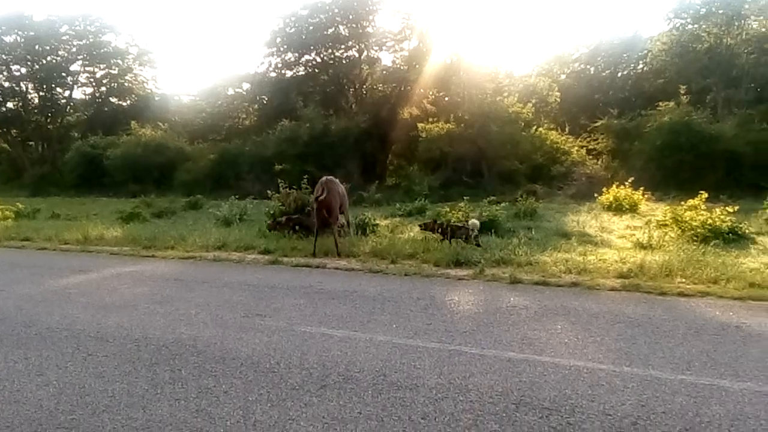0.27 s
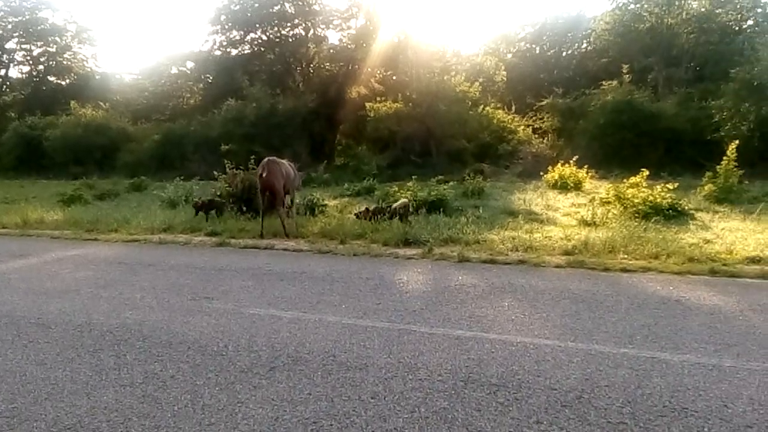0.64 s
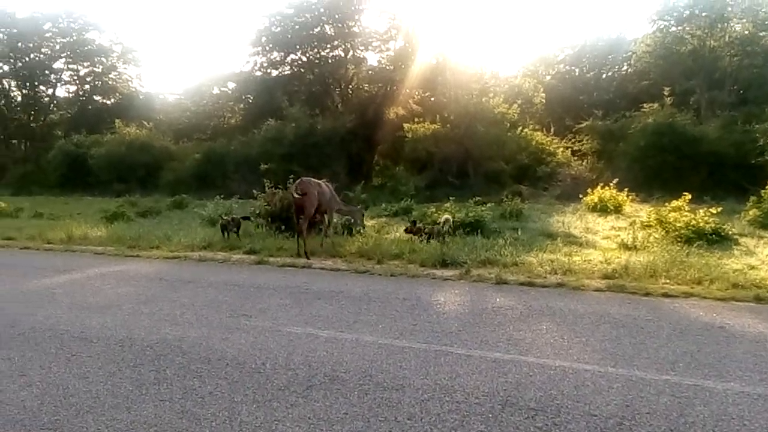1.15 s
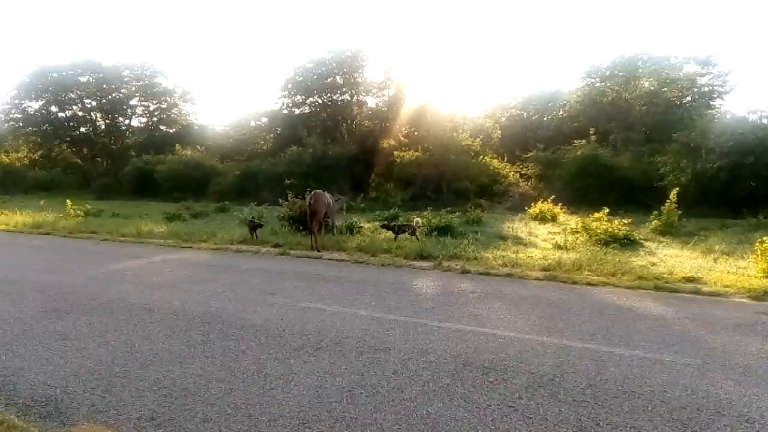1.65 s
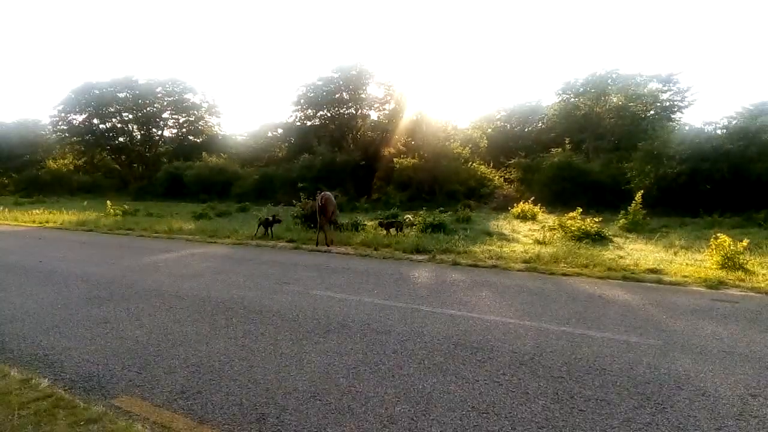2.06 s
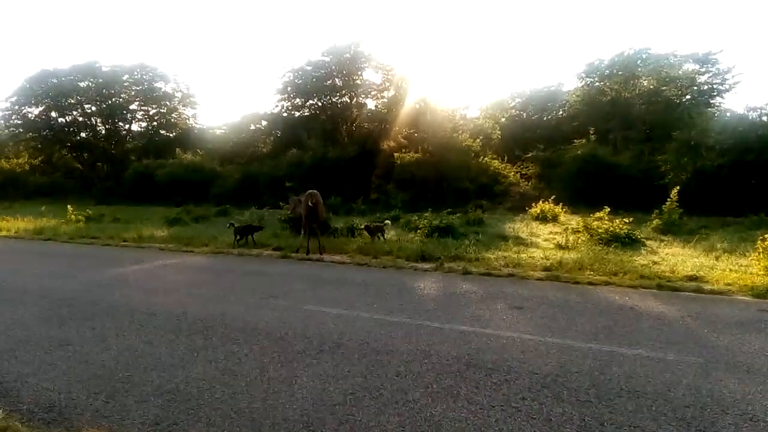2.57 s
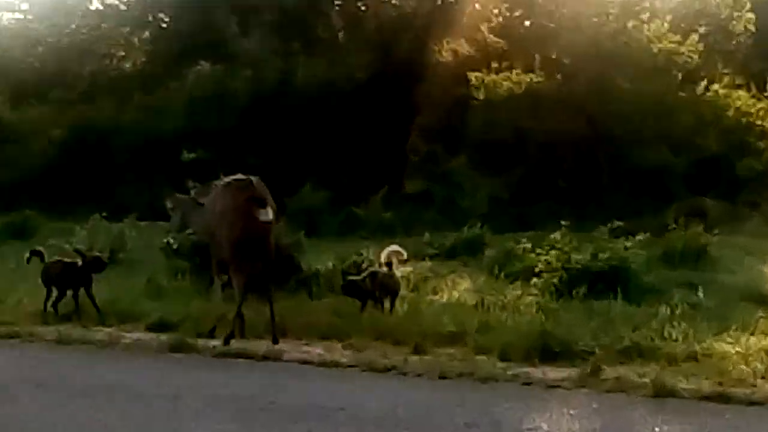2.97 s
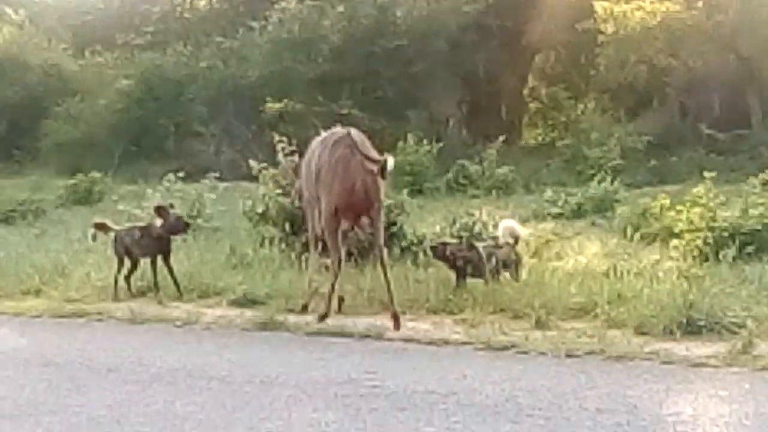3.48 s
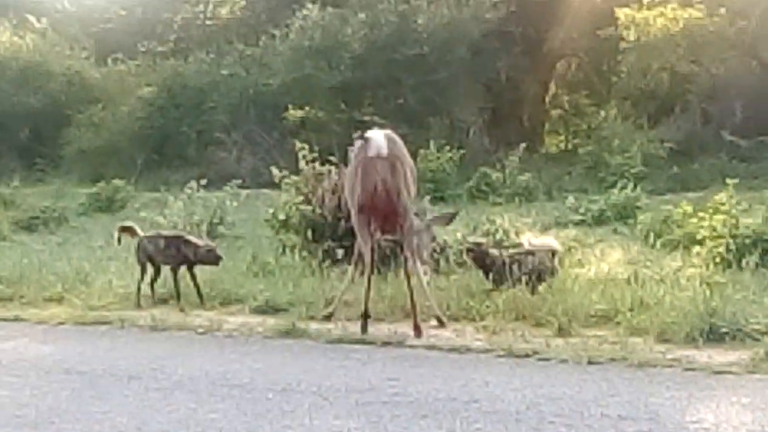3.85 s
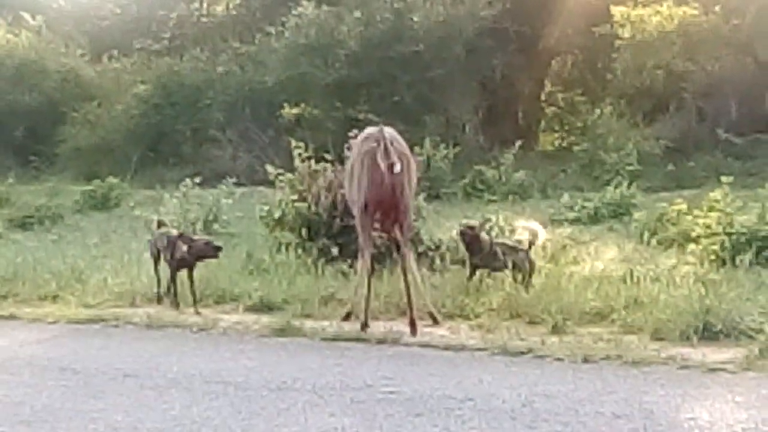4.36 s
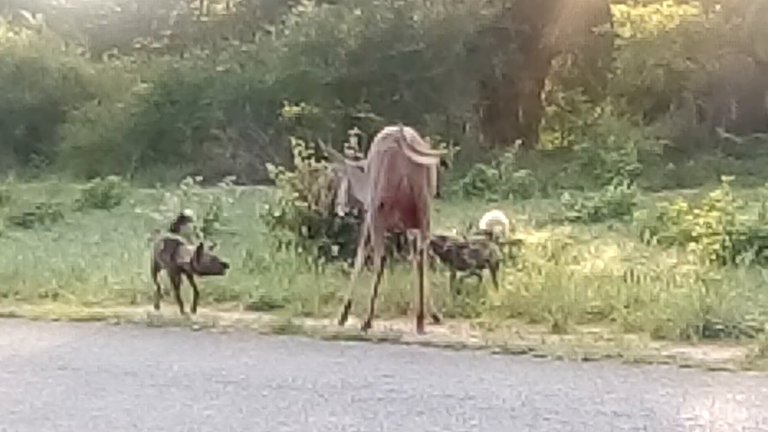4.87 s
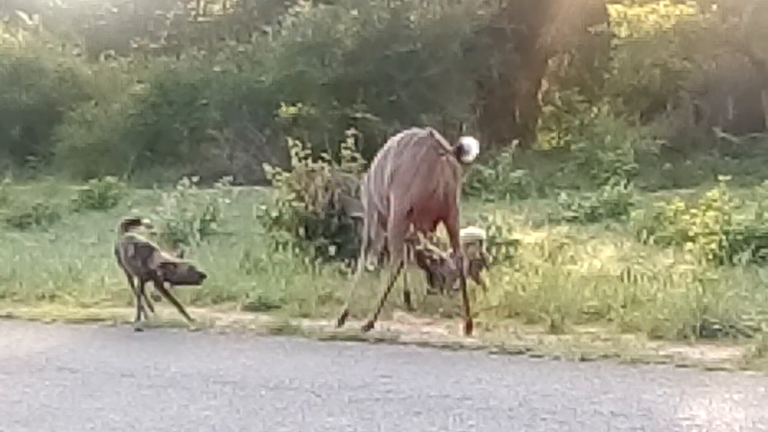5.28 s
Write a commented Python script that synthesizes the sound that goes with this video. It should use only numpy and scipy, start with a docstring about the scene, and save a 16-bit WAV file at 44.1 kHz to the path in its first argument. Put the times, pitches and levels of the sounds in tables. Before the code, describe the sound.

High chirping yips from a wild dog pack quicken and overlap, with soft scattered bush echoes, faint grass scuffles and a low rumble.

```python
"""Wild dogs twitter around an antelope on a grassy verge in the bush.
Each chirp is a short harmonic arch or downward swoop of the voice, rung through throat resonances.
A thin, very high whistle leaps up before each chirp and sinks after the high ones; one soft whine is drawn out.
Bushes and a tree line scatter the calls back as filtered, decaying noise, and a soft haze of noise follows them.
Behind lie shaped noises: steady faint background hiss, a growing low rumble, thuds, paws scuffling in grass."""
import sys
import numpy as np
from scipy import signal
from scipy.fft import rfft, irfft, next_fast_len
from scipy.io import wavfile
from scipy.ndimage import map_coordinates

SR = 44100
rng = np.random.default_rng(int(sys.argv[2]) if len(sys.argv) > 2 else 0)


def master_out(mix):
    """Clip the mix to full scale and print it as 16-bit PCM to the path in sys.argv[1]."""
    frames = np.transpose(np.atleast_2d(mix))
    ceiling = np.clip(frames, -1, 1)
    pcm = np.round(ceiling * 32767).astype(np.int16)
    wavfile.write(sys.argv[1], SR, pcm)


N = 243873

# the pack's chirps, levels as they leave the folds: (t/s, length/s, crest f/Hz, time to crest/s,
# fall after crest/octaves, level/dB, sag by the end/dB, second harmonic/dB, higher harmonics/dB,
# level of its whistle/dB)
CHIRPS = [(0.061, 0.034, 1390, 0.003, 1.68, -17.5, -22, -3.5, -12, -53.5),
          (0.091, 0.034, 756, 0.0075, 1.33, -27.5, -5, -27, -11, -64),
          (0.439, 0.048, 1616, 0.021, 1.82, -11.5, -18, -6.5, -12, -53.5),
          (0.49, 0.029, 1065, 0.0058, 2.44, -24.5, -11, -3.5, -10.5, -57),
          (0.803, 0.046, 1688, 0.015, 0.95, -9.5, -7.5, -12, -14, -61),
          (0.903, 0.053, 1586, 0.02, 1.08, -11, -17, -4, -17, -56.5),
          (0.907, 0.023, 523, 0.001, 1.2, -32, 1, -24, -19.5, -88),
          (1.015, 0.047, 1487, 0.015, 0.6, -19, -7.5, -2.5, -16.5, -65),
          (1.277, 0.038, 1709, 0.016, 1.08, -11.5, -14, -7, -11.5, -58),
          (1.341, 0.023, 852, 0.0017, 1.94, -25, -7, -20, -19.5, -66.5),
          (1.69, 0.031, 897, 0.00097, 0.9, -37, 3.5, -6.5, -13, -75),
          (1.759, 0.03, 1131, 0.0024, 3, -21, -16, -10, -16.5, -67),
          (2.06, 0.04, 1293, 0.002, 1.03, -25, 0, -2.5, -9, -59),
          (2.164, 0.053, 1043, 0.015, 1.18, -18.5, -12, -1, -3.5, -50.5),
          (2.284, 0.054, 940, 0.016, 1.44, -18, -20, -15.5, -17, -59),
          (2.401, 0.039, 1308, 0.0023, 1.16, -21.5, -2, -1, -6.5, -54),
          (2.609, 0.03, 1120, 0.00038, 2.5, -24, -13.5, -11.5, -15.5, -67),
          (2.731, 0.043, 1233, 0.002, 1.84, -21.5, -10, -1, -7, -54),
          (2.865, 0.051, 863.5, 0.02, 0.8, -19, -13.5, -8, -12, -71),
          (3.056, 0.029, 971, 0.0056, 2.5, -24, -12, -11.5, -22.5, -71),
          (3.088, 0.047, 1424, 0.0027, 1.54, -20, -2.5, -5, -11.5, -64.5),
          (3.195, 0.061, 1056, 0.022, 1.03, -17, -8, -6.5, -10, -57.5),
          (3.496, 0.018, 653, 0.002, 1.15, -34.5, -3, -16.5, -28, -78),
          (3.515, 0.043, 1672, 0.008, 1.34, -15, -9, 0, -7, -59.5),
          (3.605, 0.052, 1321, 0.015, 1.03, -17, -6.5, -4.5, -10.5, -55),
          (3.616, 0.027, 594, 0.0, 1.16, -35.5, -12.5, -11, -25.5, -80),
          (3.7, 0.033, 1400, 0.029, -0.5, -13, -13.5, -14.5, -19.5, -71),
          (3.87, 0.027, 1004, 0.0042, 2.5, -22.5, -12, -10, -20.5, -72),
          (3.957, 0.052, 778, 0.0, 1.2, -22.5, -18.5, -18, -17, -63.5),
          (4.005, 0.027, 1408, 0, 0.97, -21.5, 0.5, -5.5, -11, -58.5),
          (4.114, 0.052, 1035, 0.011, 1.07, -19, -11, -3.5, -8.5, -48),
          (4.282, 0.042, 1232, 0.0004, 2.5, -20.5, -18, -7, -17.5, -63),
          (4.368, 0.055, 813, 0.0046, 1.33, -17.5, -15, -13, -14, -60),
          (4.401, 0.042, 1471, 0.00033, 1.58, -18, -5.5, -3, -6, -54),
          (4.48, 0.045, 774, 0.011, 0.7, -23, -8.5, -7, -12, -58),
          (4.497, 0.059, 1049, 0.017, 0.54, -17, -10.5, -5.5, -9, -52.5),
          (4.728, 0.04, 1416, 0.0013, 1.7, -25.5, -5.5, -2.5, -9.5, -56),
          (4.737, 0.038, 1511, 0.00048, 1.5, -20.5, 1.5, -5, -8, -56),
          (4.82, 0.062, 1034, 0.026, 1.06, -18.5, -7.5, -10, -9, -53.5),
          (4.851, 0.047, 776, 0.011, 1.1, -18, -12, -12.5, -12, -59.5),
          (5.02, 0.044, 1495, 0.0, 1.22, -20, -7, -2, -8.5, -59),
          (5.08, 0.087, 1155, 0.032, 1.36, -19.5, -10, -3.5, -11, -64),
          (5.089, 0.035, 1127, 0.012, 2.5, -17.5, -25, -2, -6.5, -65),
          (5.186, 0.055, 1053, 0.021, 0.79, -16.5, -10.5, 0.5, -9.5, -56),
          (5.283, 0.026, 1315, 0.028, -2, -9, -10.5, -6.5, -14, -65.5),
          (5.416, 0.04, 875, 0.0063, 0.18, -27, 2.5, -23, -26, -84),
          (5.456, 0.075, 1243, 0.0201, 1.2, -8, -26.5, -8.5, -16.5, -70)]
# one soft, drawn-out whine near the end, levels before its gain: (t/s, f/Hz, level/dB)
WHINE_PATH = [(5.3, 1274, -23), (5.31, 1368, -28.5), (5.342, 1094, -36.5), (5.394, 1173, -33),
              (5.418, 984, -45.5), (5.425, 1014, -48)]
# relative colour of the rustling grass and of the haze around the calls: (f/Hz, level/dB per Hz)
GRASS_AND_HAZE_COLOUR = [(50, -5), (200, -7), (330, 6), (600, -6), (1100, -5.5), (2200, 6), (3000, -9.5),
                         (5400, -8), (7300, -30), (15500, -27.5)]


def from_db(db):
    """Decibels to gain."""
    return 10 ** (np.asarray(db) / 20)


def rms_one(x):
    """Scale to an rms of 1."""
    return x / np.sqrt(np.mean(x ** 2) + 1e-20)


def gain_at(points, hz):
    """Read a (f/Hz, level/dB) table as gain, on a log-frequency axis."""
    table_hz, table_db = np.array(points, float).T
    return from_db(np.interp(np.log(np.maximum(hz, 1)), np.log(table_hz), table_db))


def noise(colour, size):
    """Noise with the given spectrum, rms 1."""
    white = rfft(rng.standard_normal(size))
    hz = np.arange(len(white)) * SR / size
    return rms_one(irfft(white * gain_at(colour, hz), size))


def wobble(size, per_s):
    """Random values, per_s of them a second, joined by straight lines; their spread is near 1."""
    steps = np.arange(size) / SR * per_s
    return np.interp(steps, np.arange(256), rng.standard_normal(256))


def phase_of(hz):
    """Running phase of a moving pitch."""
    return 2 * np.pi * np.cumsum(hz) / SR


def fades(size, attack_s, release_s):
    """Rounded start and end."""
    t = np.arange(size) / SR
    rise = np.sin(np.pi / 2 * np.clip(t / attack_s, 0, 1))
    fall = np.sin(np.pi / 2 * np.clip(t[::-1] / release_s, 0, 1))
    return rise * fall


def add(out, s, sound):
    """Mix a sound in at a time."""
    start = max(round(s * SR), 0)
    out[start:start + len(sound)] += sound[:max(N - start, 0)]


def background(hiss_db=-72, rumble_db=-79, swell_db=13, uneven_db=3.2):
    """Steady hiss, an uneven low rumble that grows towards the end, as of wind or handling, and soft thuds."""
    # relative colour of the background hiss: (f/Hz, level/dB per Hz)
    hiss_colour = [(18, -45), (30, -23), (326, -10.5), (566, -13.5), (1120, -12.5), (1450, -5),
                   (2040, -9.5), (2800, -20.5), (5390, -19.5), (8200, -33.5), (13300, -30), (15400, -18.5)]
    # relative colour of thuds and rumble: (f/Hz, level/dB per Hz)
    rumble_colour = [(22, -34.5), (60, -4.5), (120, -3.5), (330, -11.5), (1500, -45.5)]
    # soft low thuds: (t/s, length/s, level/dB)
    thuds = [(0.03, 0.27, -71), (1.211, 0.1, -64.5), (4.687, 0.14, -71), (5.393, 0.05, -56.5)]
    swell = swell_db * np.linspace(0, 1, N) ** 2
    low_level = from_db(rumble_db + swell + uneven_db * wobble(N, 19))
    for s, length, level_db in thuds:
        add(low_level, s, from_db(level_db) * np.hanning(round(length * SR)))
    return low_level * noise(rumble_colour, N) + from_db(hiss_db) * noise(hiss_colour, N)


def scuffles(grain_db=1.6, top_hz=6000):
    """Paws in the grass: blades brush and snap in uneven bursts of noise, dulled by distance."""
    # bursts, levels before the dulling: (t/s, length/s, level/dB)
    bursts = [(2.079, 0.19, -54.5), (2.228, 0.062, -51), (2.345, 0.21, -55), (3.789, 0.092, -58.5),
              (3.878, 0.31, -51), (4.292, 0.1, -49.5)]
    level = np.zeros(N)
    for s, length, level_db in bursts:
        size = round(length * SR)
        grain = grain_db * wobble(size, 251.4)
        add(level, s, from_db(level_db + grain) * np.hanning(size))
    dulling = signal.butter(2, top_hz, fs=SR, output="sos")
    return signal.sosfilt(dulling, level * noise(GRASS_AND_HAZE_COLOUR, N))


def haze(calls, level_db=-26, linger_s=0.05):
    """Noise follows the smoothed strength of the calls: it swells with each and dies away after it."""
    r = np.exp(-1 / (linger_s * SR))
    strength = signal.lfilter([1 - r], [1, -r], np.abs(calls))
    return from_db(level_db) * strength * noise(GRASS_AND_HAZE_COLOUR, N)


def bush(calls, foliage_hz=2400, near_db=-21, near_t60=0.21, far_db=-30, far_t60=0.9,
         trees_db=-33, trees_s=0.092, trees_width_s=0.032, patchy_db=2, sway_s=.0003):
    """Quick scatter from the ground and grass, a long, faint, patchy tail, and a soft echo off the tree line."""
    # colour of the scattered sound: (f/Hz, level/dB)
    bush_colour = [(300, 17), (600, 3), (1700, 4.5), (3200, 8.5), (5500, 8), (7500, 15.5), (15000, -21)]
    t = np.arange(SR) / SR
    # the square roots make each level stand for the energy of its whole tail
    near = from_db(near_db - 60 * t / near_t60) * (t > .002) / np.sqrt(near_t60 / np.log(1e6))
    far = from_db(far_db - 60 * t / far_t60) * (t > .015) / np.sqrt(far_t60 / np.log(1e6))
    bump = np.exp(-.5 * ((t - trees_s) / trees_width_s) ** 2)
    trees = from_db(trees_db) * bump / np.sqrt(trees_width_s * np.sqrt(np.pi))
    # foliage swallows the treble on the longer paths
    foliage = signal.butter(1, foliage_hz, fs=SR, output="sos")
    distant = signal.sosfilt(foliage, rng.standard_normal(SR))
    scatter = (rng.standard_normal(SR) * near + distant * np.hypot(far, trees)) / np.sqrt(SR)
    echoes = signal.fftconvolve(calls, scatter)
    # the pitch of the echoes wavers slightly, which blurs their ring
    place = np.arange(len(echoes)) + sway_s * SR * wobble(len(echoes), 38)
    echoes = map_coordinates(echoes, [place], order=3)
    size = next_fast_len(len(echoes))
    spectrum = rfft(echoes, size)
    hz = np.arange(len(spectrum)) * SR / size
    coloured = irfft(spectrum * gain_at(bush_colour, hz), size)[:N]
    return coloured * from_db(patchy_db * wobble(N, 40))


def whistle(hz, waver=.008, breathy=0.65):
    """A thin, unsteady tone inside a narrow skirt of hiss: slow noise rides on the tone's own phase."""
    phase = phase_of(hz * (1 + waver * wobble(len(hz), 500)))
    # two equal poles at 0.92 keep only the low, slow part of the noise
    hiss = rms_one(signal.lfilter([1], [1, -1.84, .8464], rng.standard_normal(len(hz))))
    return np.sin(phase) + breathy * hiss * np.cos(phase)


def rising_whistle(flutter_db=4, pace_spread=.2, pitch_spread=0.046):
    """The whistle leaps up and out of hearing, at a slightly different pace and pitch each time."""
    # the leap before its spread, levels relative to the chirp's whistle: (t/s, f/Hz, level/dB)
    leap_path = [(0, 7900, -7), (.007, 8170, -4), (0.014, 8630, 2), (0.019, 11500, -3.5),
                 (.026, 15000, -3.5), (0.04, 15540, -9.5)]
    steps, step_hz, step_db = np.transpose(leap_path)
    steps = steps * np.exp(pace_spread * rng.uniform(-1, 1))
    t = np.arange(round(steps[-1] * SR)) / SR
    hz = np.interp(t, steps, step_hz) * (1 + pitch_spread * wobble(len(t), 120))
    level = from_db(np.interp(t, steps, step_db) + flutter_db * wobble(len(t), 300))
    return level * whistle(hz, waver=.03) * fades(len(t), attack_s=0.0033, release_s=.003)


def sinking_whistle(length, from_level_db, to_level_db, settle_s, from_hz=12600, to_hz=9930,
                    gain_db=-3.5, flutter_db=4.5, wander=.045):
    """The whistle comes down again, wandering and fluttering, and levels off."""
    t = np.arange(round(length * SR)) / SR
    glide_hz = to_hz + (from_hz - to_hz) * np.exp(-t / settle_s)
    hz = glide_hz * (1 + wander * wobble(len(t), 90))
    level_db = gain_db + np.linspace(from_level_db, to_level_db, len(t))
    level = from_db(level_db + flutter_db * wobble(len(t), 300))
    return level * whistle(hz, waver=0.007, breathy=.45) * fades(len(t), attack_s=.012, release_s=0.0052)


def high_whistles(lead_s=.024, sinks_above_hz=1020, early_s=.009, sink_s=.075, settle_s=0.021,
                  fade_db=-17, link_db=-3):
    """A whistle leaps up just before each chirp; after high ones it sinks back into the next leap, or fades."""
    out = np.zeros(N)
    leaps = [(row[0] - lead_s, row[-1]) for row in CHIRPS]
    for s, length, crest_hz, *_, whistle_db in CHIRPS:
        add(out, s - lead_s, from_db(whistle_db) * rising_whistle())
        if crest_hz > sinks_above_hz:
            # the sinking starts just before the voice stops
            start = s + length - early_s
            soon = [(at - start, db + link_db) for at, db in leaps if settle_s < at - start < sink_s]
            lasts, end_db = soon[0] if soon else (sink_s, whistle_db + fade_db)
            add(out, start, sinking_whistle(lasts, whistle_db, end_db, settle_s))
    return out


def whine(gain_db=9, overtone_db=-10, jitter=.005, count=4):
    """A nearly pure voice on a drawn-out path of pitch, each harmonic weaker than the last."""
    s, hz, level_db = np.transpose(WHINE_PATH)
    t = np.arange(s[0], s[-1], 1 / SR)
    phase = phase_of(np.interp(t, s, hz) * (1 + jitter * wobble(len(t), 900)))
    voice = sum(from_db(overtone_db * k) * np.sin((k + 1) * phase) for k in range(count))
    level = from_db(gain_db + np.interp(t, s, level_db))
    return voice * level * fades(len(t), attack_s=0.011, release_s=0.011)


def chirp_pitch(t, length, crest_hz, crest_s, fall_octaves,
                scoop_octaves=0.1476, scoop_s=.02, fall_power=1.7, lowest_hz=281.5):
    """An arch: a scoop up to the crest and a steepening fall; with the crest at the start, a plain swoop."""
    before = np.maximum(crest_s - t, 0) / scoop_s
    after = np.maximum(t - crest_s, 0) / max(length - crest_s, 1e-3)
    octaves = -scoop_octaves * before ** 2 - fall_octaves * after ** fall_power
    return np.maximum(crest_hz * 2 ** octaves, lowest_hz)


def chirp_effort(progress, pitch, sag_db, hold_share=.345, yelp_hz=646, yelp_db_per_octave=15):
    """Effort in dB holds, sags as the call runs out, and recovers where the pitch drops into a throaty yelp."""
    spent = np.maximum(progress - hold_share, 0) / (1 - hold_share)
    return sag_db * spent + yelp_db_per_octave * np.maximum(np.log2(yelp_hz / pitch), 0)


def chirp(length, arch, level_db, sag_db, second_db, higher_db, edge_s, jitter=0.017, shimmer_db=2.8,
          slope_db=-1.5, dulling=0.14, slack_db=-5, entry_db=-6.0, rasp_db=-35.0, count=7,
          firm_db=-16, hoarse_per_db=0.1662):
    """The folds make a nearly clean harmonic glide that loosens and dulls towards its end."""
    t = np.arange(round((length + 3 * edge_s) * SR)) / SR
    size = len(t)
    voiced_s = np.clip(t - edge_s, 0, length)
    crest_hz, crest_s, fall_octaves = arch
    pitch = chirp_pitch(voiced_s, length, crest_hz, crest_s, fall_octaves)
    effort_db = chirp_effort(voiced_s / length, pitch, sag_db)
    late = np.linspace(0, 1, size) ** 3
    # calls softer than firm_db grow hoarse
    hoarse = max(hoarse_per_db * (firm_db - level_db), 0)
    loose = .35 + 3.5 * late + hoarse
    phase = phase_of(pitch * (1 + jitter * loose * wobble(size, 878)))
    # each step up the harmonics loses more where the call has weak overtones, a slack end or a low pitch
    low_pitch_octaves = np.log2(np.maximum(1000 / pitch, 1))
    step_db = slope_db + dulling * higher_db + slack_db * late - 3 * low_pitch_octaves
    voice = 0
    for k in range(1, count + 1):
        if k == 1:
            source_db = 0
        elif k == 2:
            source_db = second_db
        else:
            source_db = higher_db + step_db * (k - 3)
        flutter_db = shimmer_db * np.sqrt(k * loose) * wobble(size, 294)
        # the tone starts purer; overtones come in fully a moment later
        onset_db = entry_db * (k - 1) * np.exp(-t / edge_s)
        voice = voice + from_db(source_db + flutter_db + onset_db) * np.sin(k * phase)
    # air escapes once in each cycle of the folds, more so where the voice is slack
    breath = loose * rng.standard_normal(size) * (1 + np.cos(phase))
    rasp = from_db(rasp_db - .5 * effort_db) * breath
    # the longer the scoop, the slower the attack
    edges = fades(size, attack_s=.007 + .14 * crest_s, release_s=.021) ** 2
    return (voice + rasp) * from_db(level_db + effort_db) * edges


def throat(source, top_hz=5550):
    """Fixed resonances make each harmonic swell and ring briefly as it sweeps through them."""
    # resonances of throat and mouth: (f/Hz, width/Hz, level/dB)
    resonances = [(934.6, 132, -6), (1252, 183, -8), (1513, 288, -12), (1814, 297, -3.5), (1909, 98, -6.5),
                  (2093, 80, -13), (3252, 490, -15), (3895, 200, -16), (4800, 660, -12.5)]
    out = 0
    for hz, width_hz, level_db in resonances:
        r = np.exp(-np.pi * width_hz / SR)
        poles = [1, -2 * r * np.cos(2 * np.pi * hz / SR), r * r]
        gain = from_db(level_db) * (1 - r * r) / 2
        # the tiny offset keeps the filter clear of vanishing numbers
        out = out + gain * signal.lfilter([1, 0, -1], poles, source + 1e-18)
    return signal.sosfilt(signal.butter(10, top_hz, fs=SR, output="sos"), out)


def twitter(edge_s=0.0034, low_hz=280):
    """All chirps of the pack and the whine; the voice needs a few ms to start and to stop."""
    out = np.zeros(N)
    for s, length, *arch, level_db, sag_db, second_db, higher_db, _ in CHIRPS:
        add(out, s - edge_s, chirp(length, arch, level_db, sag_db, second_db, higher_db, edge_s))
    add(out, WHINE_PATH[0][0], whine())
    low_cut = signal.butter(4, low_hz, "high", fs=SR, output="sos")
    return signal.sosfilt(low_cut, throat(out))


def scene():
    """The pack, its echoes and the quiet bush, as they meet at one microphone."""
    calls = twitter() + high_whistles()
    return (calls + bush(calls) + haze(calls) + scuffles() + background())[None]


def record(dry, cutoff_hz=15900):
    """At the microphone the top of the treble is cut steeply by an elliptic low-pass."""
    return signal.sosfilt(signal.ellip(12, .1, 80, cutoff_hz, fs=SR, output="sos"), dry)


dry = scene()
out = record(dry)
master_out(out)
```